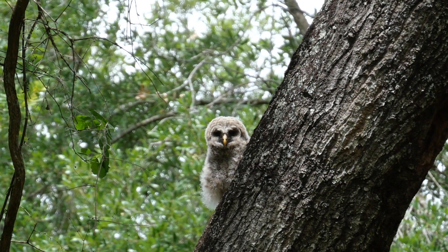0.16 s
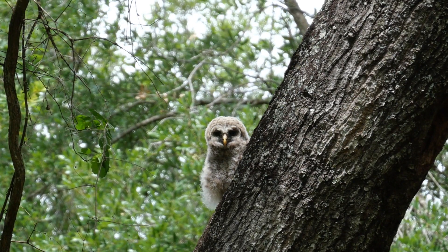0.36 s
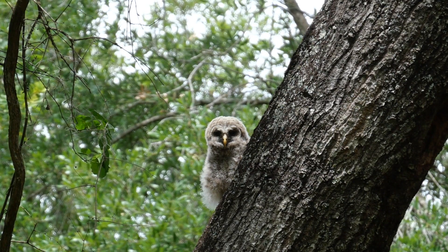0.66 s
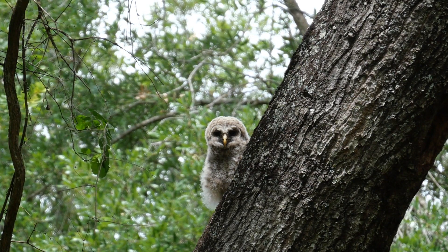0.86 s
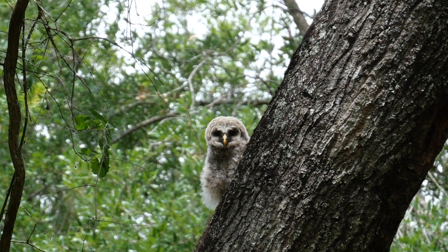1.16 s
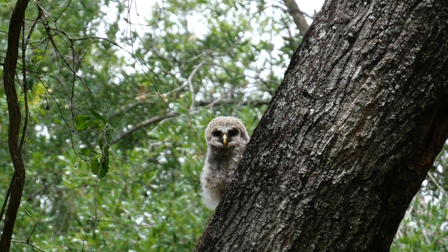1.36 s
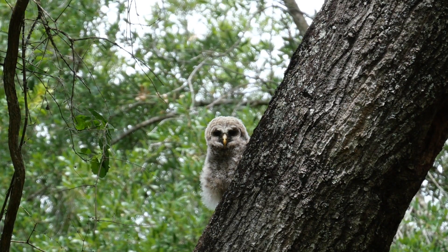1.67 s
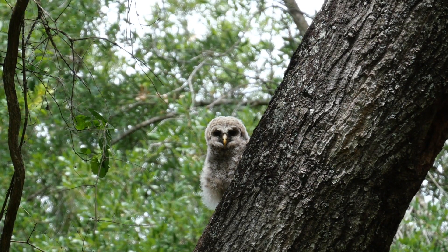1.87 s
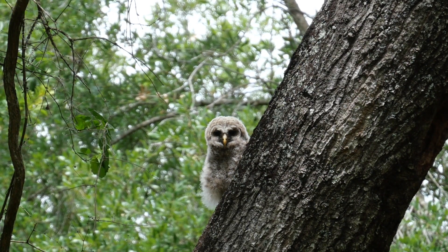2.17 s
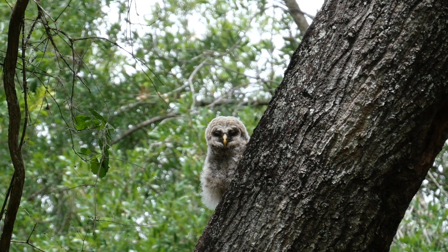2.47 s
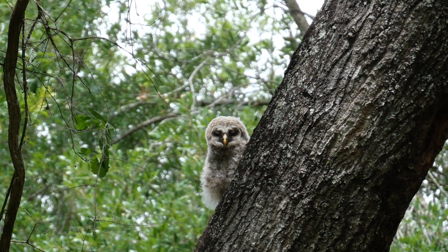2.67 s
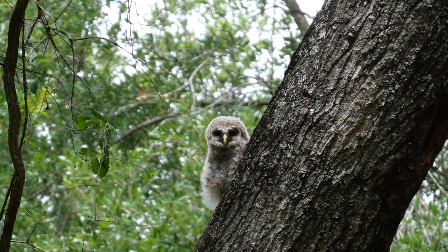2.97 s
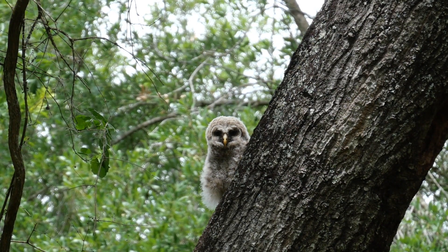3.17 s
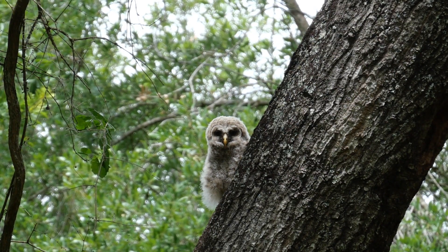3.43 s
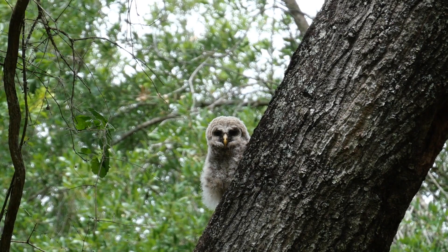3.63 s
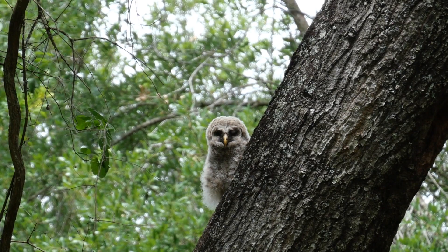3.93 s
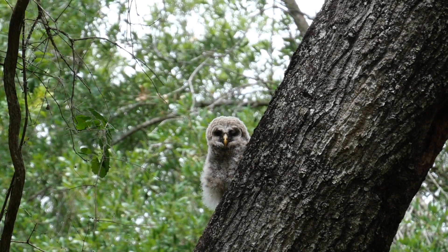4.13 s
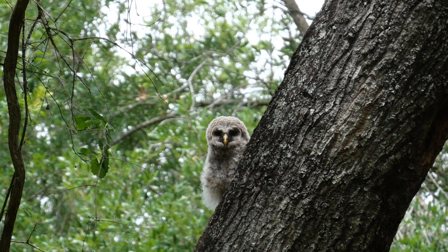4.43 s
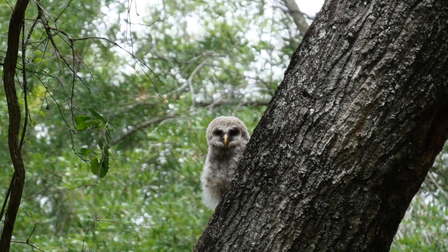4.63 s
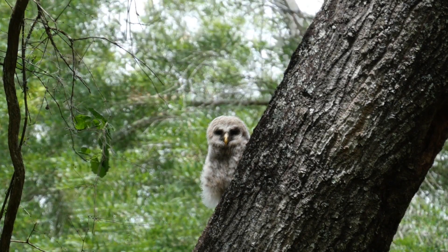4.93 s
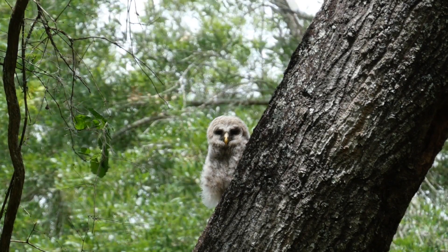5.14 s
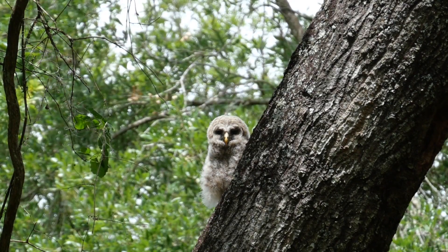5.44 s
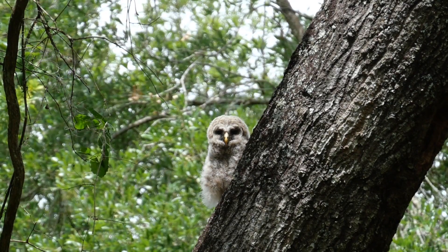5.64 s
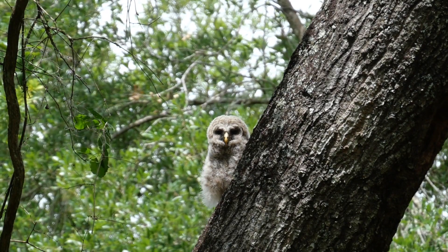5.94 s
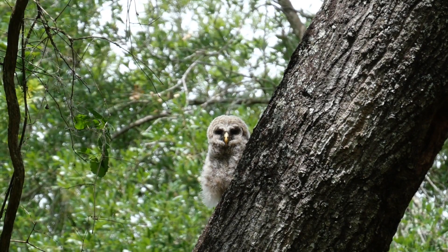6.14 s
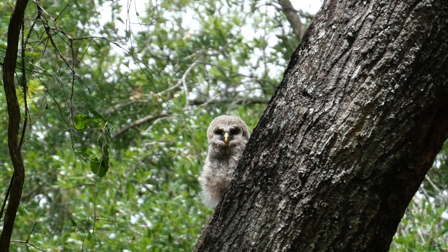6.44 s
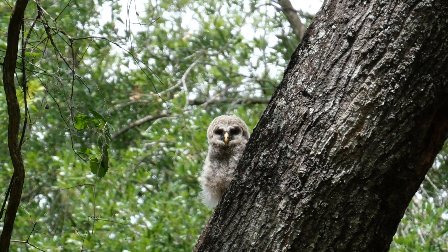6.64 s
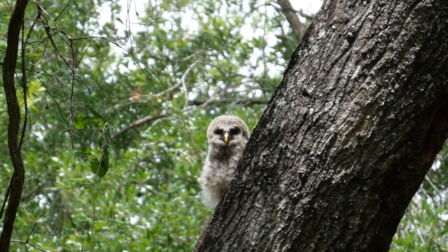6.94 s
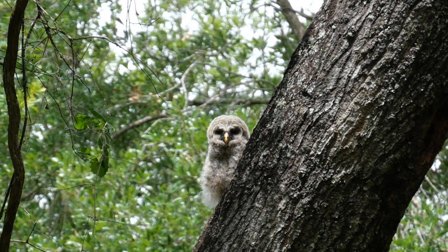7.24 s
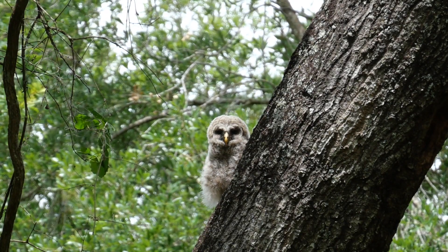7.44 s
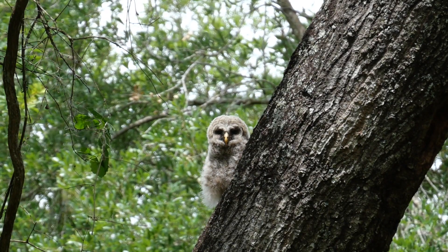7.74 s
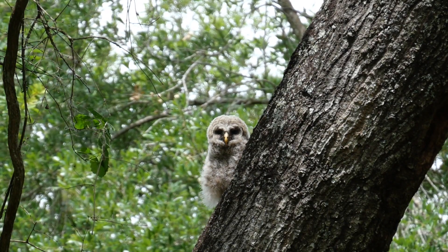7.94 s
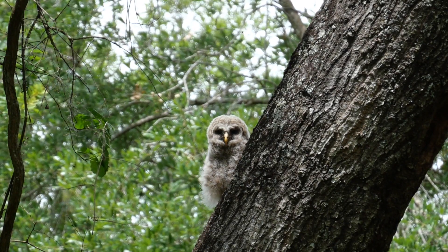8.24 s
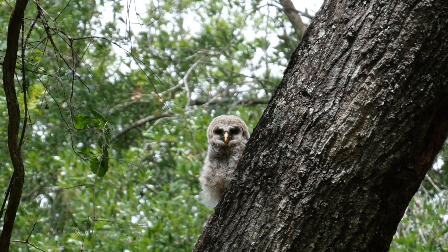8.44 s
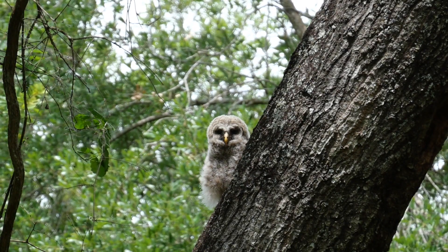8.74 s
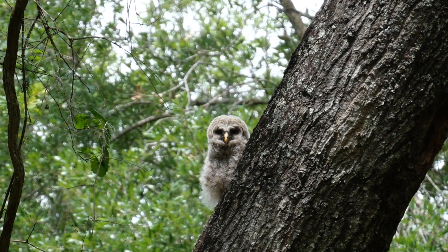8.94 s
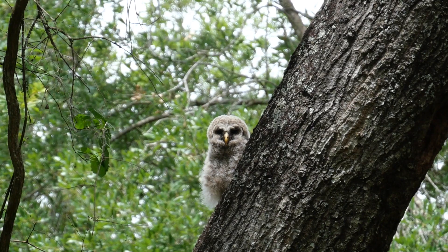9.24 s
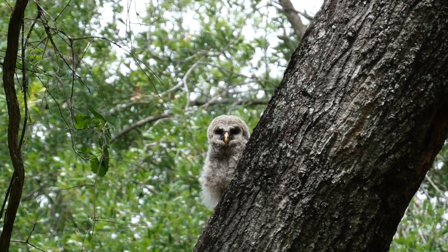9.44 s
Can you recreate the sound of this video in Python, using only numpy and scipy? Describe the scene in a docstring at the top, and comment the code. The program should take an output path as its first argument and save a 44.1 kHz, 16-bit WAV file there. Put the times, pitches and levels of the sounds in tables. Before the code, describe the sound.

Short, echoing owl clucks build into a steady cackle among the trees, with whistling songbirds, thin cricket scraping and a low, faraway rumble.

```python
"""A microphone in the woods, with distant traffic, leaf hiss and a bush cricket scraping throughout.
A large bird gives three lone clucks nearby, its voice membrane slapping shut; the trees return a long,
thin echo. Faint notes and a clucked reply come from farther off, and wind puffs on the microphone.
Halfway a songbird starts rising whistles, a second cricket joins, twigs tick and a far hum comes up.
The large bird cackles on to the end, while another songbird sings two runs of a looping phrase."""
import sys
import numpy as np
from scipy import signal
from scipy.fft import rfft, irfft
from scipy.io import wavfile

SR = 44100
rng = np.random.default_rng(int(sys.argv[2]) if len(sys.argv) > 2 else 0)


def pcm_store(signal):
    """Save signal as 16-bit PCM."""
    levels = np.round(np.clip(np.atleast_2d(signal), -1, 1) * 32767)
    wavfile.write(sys.argv[1], SR, levels.astype(np.int16).T)


N = 423360
TIME = np.arange(N) / SR
LEAD = SR // 2   # samples of run-in, so that earlier echoes still ring
SIDE = np.array([[1], [-1]])   # adds on the left, subtracts on the right

# clucks, near and far: (time [s], length [s], level [dB], pitch [Hz], roughness [0 = clean],
# gain of the direct path through the leaves [dB])
CLUCKS = [(-.085, 0.1, -36.5, 1037, 0.55, 0.5), (0.389, .085, -35.5, 1020, .5, -0.5),
          (1.204, .078, -36.5, 1005, .8, -.5), (1.737, 0.078, -38, 971, 1.03, -1),
          (3.594, 0.089, -49.5, 1032, 0.8, -14), (3.947, .075, -47, 1042, 1.1, -11),
          (4.137, 0.11, -58, 1048, .6, -12), (4.396, 0.081, -47, 1037, 0.27, -5),
          (4.578, .09, -46.5, 1021, 0.8, -7.5), (4.951, 0.08, -38, 1015, 0.5, -3),
          (5.283, 0.078, -33.5, 1008, 0, -3.5), (5.544, .064, -34, 1032, 0.56, -2),
          (5.836, 0.073, -32.5, 1044, 0.39, -3), (6.142, 0.067, -32.5, 1051, 0.48, -2),
          (6.476, 0.081, -32.5, 1062, 0.25, -2), (6.812, 0.085, -32, 1050, 0.36, -1.5),
          (7.119, 0.0254, -32.5, 1025, 1, -1.5), (7.137, 0.047, -36.5, 1046, 0.81, -0.5),
          (7.485, 0.092, -32.5, 1062, 0.34, -1.5), (7.867, 0.083, -30.5, 1057, 0.16, -2),
          (8.26, 0.087, -31.5, 1050, 0.1, -1.5), (8.669, 0.09, -31, 1060, 0.18, -1.5),
          (9.081, 0.093, -31.5, 1052, 0.05, -1.5), (9.507, 0.1, -32.5, 1063, 0.21, -0.5)]
# course of one cluck: (position [share of length], pitch [ratio], clear tone [dB], its overtones [dB],
# slap spacing [swings], slap [dB])
CLUCK_SHAPE = [(0, .90, -12.5, 2, 6, -11.5), (.12, .925, -8.5, -1.5, 6, -10), (.28, .97, -4.5, -2, 5, -3),
               (.39, 1, -6, -25, 3, 0), (.6, 1, -9.5, -23, 3, -1.5), (.71, 1.16, -7.5, 4.5, 4, -7.5),
               (.8, 1.15, -9.5, -1, 4, -16), (.91, 1.08, -12, 7, 4.1, -19), (1, 0.83, -40, 5, 6, -42)]
# harmonics of the clear tone: (harmonic [number], level [dB])
CLUCK_HARMONICS = [(1, 0.5), (2, -3.5), (3, -9), (4, -13.5)]
# resonances of throat and open bill: (frequency [Hz], width [Hz], gain [dB])
THROAT = [(1200, 440, -47), (1375, 214, -3), (2000, 1000, -1.5), (2464, 238, 4.5), (2680, 124, -7),
          (3430, 1050, 0.5)]
# narrow bands that the cackle's echo favours: (frequency [Hz], width [Hz], gain [dB])
ECHO_RINGS = [(1020, 20, 1.5), (2330, 20, -0.5), (2546, 12, -4), (3420, 78, -8)]
# echo of the trees: (frequency [Hz], time to fall 60 dB [s], level [dB])
TREE_ECHO = [(1020, 1.07, -1.5), (1540, 1.3, 0), (2200, 1.33, 0), (2200, 1.33, 1), (2580, 0.83, 2),
             (3270, 1.4, 3), (5330, 1, 2.5), (8800, 0.13, -40)]
# stereo width of the background: (frequency [Hz], side against mid [dB])
STEREO_WIDTH = [(30, -28), (120, -33.5), (350, -18.5), (900, -15.5), (2500, -11.5), (5000, -4.5),
                (7500, -12.5), (8600, -34), (10000, -34), (14000, -28)]
# spectrum of the distant traffic: (frequency [Hz], relative density [dB])
RUMBLE_SPECTRUM = [(12, -41), (20, -8), (54, -2.5), (107, 0.5), (202, -5.5), (329, -12), (367, -14.5),
                   (498, -17), (665, -20.5), (905, -23), (1050, -21), (1120, -26.5), (1500, -42),
                   (1950, -59), (3300, -120)]
# course of the traffic rumble: (time [s], level before trim [dB])
TRAFFIC_LEVEL = [(0.1, -55), (4.5, -53.5), (5.02, -57.5), (5.28, -54), (9.42, -53.5), (9.45, -51)]
# spectrum of the leaf hiss: (frequency [Hz], relative density [dB])
LEAF_SPECTRUM = [(1200, 2.5), (2000, 2), (2600, 1.5), (3500, -4.5), (5000, -2.5), (6500, -6), (7600, 5.5),
                 (8400, 0.5), (9400, 8.5), (10600, -22), (11100, -9), (15500, -10)]
# one wing stroke of each cricket: (position [share of stroke], pitch [Hz], relative level [dB])
FIRST_STROKE = [(0, 9635, -12), (.15, 9460, 3), (.35, 10400, 9), (.52, 10630, 7.5), (.7, 10140, 8),
                (.87, 9266, 11), (1, 9520, -8)]
SECOND_STROKE = [(0, 9600, -15), (.2, 9690, 0), (.45, 10090, 14), (.65, 10020, 8), (.85, 9260, -18),
                 (1, 9530, -27)]
# notes of far birds: (time [s], length [s], first pitch [Hz], last pitch [Hz], level [dB])
FAR_NOTES = [(1.523, 0.077, 2870, 2100, -62), (1.64, 0.093, 2040, 2270, -61),
             (2.704, 0.21, 2390, 2310, -69), (3.001, 0.26, 2710, 2630, -74), (3.843, .06, 3250, 3210, -70),
             (4.201, 0.041, 3150, 4060, -60.5), (4.645, 0.2, 4700, 2600, -66.5),
             (7.708, 0.2, 4650, 4200, -62), (8.531, 0.09, 4680, 4400, -64)]
# rising whistles: (time [s], length [s], pitch [Hz], level [dB], sweep [1 = usual])
WHISTLES = [(4.272, 0.076, 2510, -52.5, 2.17), (4.397, 0.076, 2512, -46, 1.1),
            (5.367, .17, 2820, -48, 1.07), (5.649, .098, 2825, -46.5, .8), (5.886, 0.096, 2735, -47.5, .7),
            (6.163, 0.12, 2730, -48.5, .6), (6.398, .14, 2680, -45, .6), (6.636, 0.13, 2670, -47, .9),
            (6.904, .15, 2617, -49.5, 1), (7.19, 0.16, 2630, -49, 1.1), (7.494, .066, 2514, -37.5, 1.2),
            (7.554, .1, 2630, -41.5, .5), (7.903, 0.093, 2674, -46, 0.84)]
# course of one whistle: (position [share of length], pitch [ratio], relative level [dB])
WHISTLE_SHAPE = [(0, .89, -18), (.2, .95, -5), (.6, 1, 0), (.86, 1.04, 1), (.93, 1.05, -2), (1, 1.05, -10)]
# course of one sharp chip: (time [s], pitch [Hz], level [dB])
CHIP = [(4.578, 5160, -50), (4.584, 6510, -57), (4.590, 5570, -40.5), (4.596, 5660, -47),
        (4.604, 5870, -57)]
# twig ticks: (time [s], level before filtering [dB])
TWIG_TICKS = [(4.896, -38), (5.450, -41)]
# runs of the looping phrase: (time [s], last phrase starts before [s], period [s], level [dB])
SONG_RUNS = [(5.088, 6.4, .2895, -48.5), (8.592, 9.6, .2852, -47.5)]
# the phrase's four slurs, each a list of (time in phrase [s], pitch [Hz], relative level [dB])
PHRASE_SLURS = [
    [(0, 6270, -11), (.008, 5530, -2), (.018, 4690, -2), (.028, 4490, -2)],
    [(.040, 3010, -1.5), (.051, 3416, 5), (.060, 4590, 1), (.066, 4830, 6), (.073, 4750, -12)],
    [(.108, 3945, -18), (.121, 3650, 7), (.133, 3090, 4), (.142, 3010, -2)],
    [(.160, 2897, -13), (.185, 2550, 0), (.215, 2000, -2), (.230, 1950, -32)],
]


def from_db(db):
    """Decibels to gain."""
    return 10 ** (np.asarray(db) / 20)


def rms_one(x):
    """Scale to rms 1."""
    return x / np.sqrt(np.mean(x ** 2) + 1e-20)


def along(rows, where):
    """Every later column of a table, read along its first."""
    first, *columns = np.transpose(rows)
    return [np.interp(where, first, column) for column in columns]


def at_hz(points, hz):
    """A spectrum read on a log-frequency axis."""
    point_hz, value = np.transpose(points)
    return np.interp(np.log(hz + 1), np.log(point_hz), value)


def band(x, edge_hz, kind, order=2):
    """Butterworth filter."""
    sections = signal.butter(order, np.clip(edge_hz, 5, SR / 2 - 500), kind, fs=SR, output="sos")
    return signal.sosfilt(sections, x + 1e-18)


def drift(rate_hz, size):
    """A random wander with a spread of about 1."""
    wander = band(rng.standard_normal(size + LEAD), rate_hz, "low")
    return rms_one(wander[LEAD // 2:])[-size:]


def add(track, time_s, sound):
    """Mix a sound into a track that begins with the run-in."""
    start = max(round(time_s * SR) + LEAD, 0)
    part = sound[:max(len(track) - start, 0)]
    track[start:start + len(part)] += part


def turns(hz):
    """Cycles completed at a moving pitch."""
    return np.cumsum(hz) / SR


def swell(start_s, attack_s, hold_s, release_s, db):
    """A gain that rises, holds and dies away."""
    rise = np.clip((TIME - start_s) / attack_s, 0, 1)
    return from_db(db) * rise * np.exp(-np.maximum(TIME - start_s - attack_s - hold_s, 0) / release_s)


def ring(clicks, hz, width_hz):
    """A resonance: each click sets a dying sine ringing."""
    radius, angle = np.exp(-np.pi * width_hz / SR), 2 * np.pi * hz / SR
    return signal.lfilter([0, np.sin(angle)], [1, -2 * radius * np.cos(angle), radius ** 2], clicks + 1e-18)


def cluck(length_s, pitch_hz, bright_db, rough, glide_depth, rasp_db=-34, flutter_db=5.5):
    """The voice membrane swings near 1 kHz and, driven hard, slaps shut every few swings."""
    size = int(length_s * SR)
    glide, tone_db, overtone_db, spacing, slap_db = along(CLUCK_SHAPE, np.arange(size) / size)
    waver = 1 + .008 * (1 + rough) * drift(200, size)
    cycles = turns(pitch_hz * glide ** glide_depth * waver)
    slaps, swing, wait = np.zeros(size), 1, 1
    for late, weakness, slip in rng.standard_normal((40, 3)):
        i = np.searchsorted(cycles, swing + 0.11 * rough * slip)
        if i >= size:
            break
        pressure = (wait / spacing[i]) ** 0.051   # builds during the wait
        slaps[i] = from_db(slap_db[i] - 0.65 * weakness) * pressure
        wait = max(2, round(spacing[i] + 1.5 * rough * abs(late)))   # a rough voice skips swings
        swing += wait
    slaps += from_db(slap_db + rasp_db) * rng.standard_normal(size)
    bill = sum(from_db(db + bright_db * (k > 1)) * ring(slaps, hz, width)
               for k, (hz, width, db) in enumerate(THROAT))
    tone = sum(from_db(db + (bright_db + overtone_db) * (n > 1)) * np.sin(2 * np.pi * n * cycles)
               for n, db in CLUCK_HARMONICS)
    return bill + from_db(tone_db + flutter_db * rough * drift(130, size)) * tone


def cackle(calm_hz=1007.7, excited_hz=1052):
    """All clucks, as two tracks: through the leaves to the microphone, and out into the woods."""
    tracks = np.zeros((2, N + LEAD))
    for time_s, length_s, db, pitch_hz, rough, direct_db in CLUCKS:
        glide_depth = np.interp(pitch_hz, [calm_hz, excited_hz], [.35, 1])   # excitement widens the glide
        bright_db = 0.3 + 0.6 * rough + 0.27 * direct_db   # roughness adds treble, leaves take it
        call = from_db(db) * cluck(length_s, pitch_hz, bright_db, rough, glide_depth)
        add(tracks[0], time_s, from_db(direct_db) * call)
        add(tracks[1], time_s, call)
    voice = band(tracks, 920, "high", order=10)
    top_rasp = from_db(-13) * band(voice, 4700, "high", order=6)
    return band(voice, 3600, "low", order=6) + top_rasp


def echo_ringing(x):
    """The echo favours a few narrow bands."""
    return x + sum(from_db(db) * band(x, [hz - width / 2, hz + width / 2], "band", order=1)
                   for hz, width, db in ECHO_RINGS)


def tree_echo(x, build_s=0.0074, lumpy_db=4):
    """Echoes off many trunks, some stronger than others, dying soonest in the high treble."""
    t = TIME[:SR * 3 // 2]
    echoes = rms_one(rng.standard_normal(len(t)) * from_db(lumpy_db * drift(132, len(t))))
    spectrum = rfft(echoes * (1 - np.exp(-t / build_s)))
    hz = np.arange(len(spectrum)) * SR / len(t)
    centres_hz, response = np.array(TREE_ECHO)[:, 0], 0
    for this_band, (_, t60, db) in zip(np.eye(len(TREE_ECHO)), TREE_ECHO):
        weight = at_hz(np.column_stack([centres_hz, this_band]), hz)
        response += irfft(spectrum * weight, len(t)) * from_db(db - 60 * t / t60)
    return signal.fftconvolve(x, response / np.sqrt(np.sum(response ** 2)))[:len(x)]


def stereo_noise(spectrum):
    """Coloured noise, nearly the same in both channels; rms 1."""
    hz = np.arange(N // 2 + 1) * SR / N
    mid, side = rfft(rng.standard_normal((2, N))) * from_db(at_hz(spectrum, hz))
    return rms_one(irfft(mid + side * from_db(at_hz(STEREO_WIDTH, hz)) * SIDE, N))


def far_drone(hz, width_hz):
    """A note that fades in and out on its long way to the microphone."""
    phase = 2 * np.pi * turns(hz * np.ones(N))
    return drift(width_hz, N) * np.sin(phase) + drift(width_hz, N) * np.cos(phase)


def distant_traffic(trim_db=-0.42, cruise_hz=106.2, octave_up_at_s=9.58, db_per_octave=7.5):
    """A far road rumbles; one engine cruises, then speeds up ever faster and grows louder."""
    rumble = from_db(along(TRAFFIC_LEVEL, TIME)[0] + trim_db) * stereo_noise(RUMBLE_SPECTRUM)
    speed = 1 + np.exp((TIME - octave_up_at_s) / .95)
    engine_db = -65.5 + db_per_octave * np.log2(speed)
    return rumble + from_db(engine_db) * far_drone(cruise_hz * speed, width_hz=5.9)


def leaf_hiss(db=-60.5):
    """A steady, faint hiss from the foliage round the microphone."""
    return from_db(db) * stereo_noise(LEAF_SPECTRUM)


def cricket(stroke, strokes_per_s, top_hz=10750):
    """A scraper runs over a file of teeth: pitch follows the wing's speed; leaves scatter the sound."""
    position = turns(strokes_per_s * (1 + 0.00398 * drift(2, N))) % 1
    hz, db = along(stroke, position)
    level = from_db(db + 1.6 * drift(200, N))
    song = level * np.sin(2 * np.pi * turns(hz * (1 + 0.0178 * drift(1180, N))))
    t = TIME[:SR // 40]
    leaves = rng.standard_normal(len(t)) * np.exp(-t / 0.0063) * from_db(-22.5)
    leaves[0] = 1   # the direct path
    return rms_one(band(signal.fftconvolve(song, leaves)[:N], top_hz, "low", order=16))


def crickets(first_db=-59.5, second_db=-60.5, join_s=(4.8, 5.43)):
    """One insect sings throughout; a second swells from a murmur to full song halfway."""
    first = from_db(first_db) * cricket(FIRST_STROKE, strokes_per_s=70.5)
    joining_db = np.interp(TIME, join_s, [-12, 0])
    return first + from_db(second_db + joining_db) * cricket(SECOND_STROKE, strokes_per_s=66.5)


def slur(course, octave_db, waver, flutter_db):
    """A bird's gliding, slightly unsteady whistle with its octave."""
    t = np.arange(course[0][0], course[-1][0], 1 / SR)
    hz, db = along(course, t)
    phase = 2 * np.pi * turns(hz * (1 + waver * drift(115, len(t))))
    level = from_db(db + flutter_db * drift(97, len(t))) * signal.windows.tukey(len(t), .1)
    return level * (np.sin(phase) + from_db(octave_db) * np.sin(2 * phase))


def far_birds():
    """Faint, plain glides from deeper in the woods."""
    track = np.zeros(N + LEAD)
    for time_s, length_s, first_hz, last_hz, db in FAR_NOTES:
        course = [(time_s, first_hz, db), (time_s + length_s, last_hz, db)]
        add(track, time_s, slur(course, octave_db=-35, waver=0.0234, flutter_db=3))
    return track


def wind_puff():
    """One soft, low puff of wind on the microphone."""
    buffeting = rms_one(band(rng.standard_normal(N), [40, 75], "band"))
    return swell(start_s=4.1, attack_s=0.065, hold_s=.08, release_s=0.093, db=-56) * buffeting


def rising_whistles(flick=0.18):
    """A songbird's whistles climb and flick up at the end; low or wide ones have the strongest octave."""
    track = np.zeros(N + LEAD)
    for time_s, length_s, hz, db, sweep in WHISTLES:
        course = [(share * length_s, hz * (ratio ** sweep + flick * sweep ** 2 * share ** 20), db + swell_db)
                  for share, ratio, swell_db in WHISTLE_SHAPE]
        octave_level_db = -60 - .024 * (hz - 2500) + 4 * (sweep - 1)
        add(track, time_s, slur(course, octave_level_db - db, waver=0.0085, flutter_db=3.5))
    return track


def chip():
    """One sharp, high note from a small bird."""
    track = np.zeros(N + LEAD)
    add(track, CHIP[0][0], slur(CHIP, octave_db=-35, waver=.01, flutter_db=4))
    return track


def twigs(decay_s=0.0014):
    """Tiny dry snaps, each a burst of noise."""
    track, t = np.zeros(N + LEAD), TIME[:SR // 50]
    for time_s, db in TWIG_TICKS:
        snap = rng.standard_normal(len(t)) * np.exp(-t / decay_s)
        add(track, time_s, from_db(db) * band(snap, [700, 7000], "band"))
    return track


def far_hum(hz=218.4):
    """A hum from the road comes up and slowly fades."""
    return swell(start_s=4.9, attack_s=0.35, hold_s=.3, release_s=5, db=-66) * far_drone(hz, width_hz=3)


def looping_song(first_phrase_db=-8.5):
    """A songbird repeats a phrase of four slurs, opening each run softly."""
    track = np.zeros(N + LEAD)
    for start_s, end_s, period_s, db in SONG_RUNS:
        for k, time_s in enumerate(np.arange(start_s, end_s, period_s)):
            gain = from_db(db + first_phrase_db * (k == 0))
            for course in PHRASE_SLURS:
                note = slur(course, octave_db=-24, waver=0.0093, flutter_db=3)
                add(track, time_s + course[0][0], gain * note)
    return track


def scene(cackle_echo_db=-12, song_echo_db=-10, echo_side_db=-20):
    """At the microphone: birds in the centre, their echo slightly wider, over insects and traffic."""
    direct_cackle, sent_cackle = cackle()
    song = far_birds() + rising_whistles() + chip() + looping_song()
    into_woods = from_db(cackle_echo_db) * echo_ringing(sent_cackle) + from_db(song_echo_db) * song
    echo = tree_echo(into_woods) + from_db(echo_side_db) * tree_echo(into_woods) * SIDE
    foreground = direct_cackle + song + twigs() + echo
    background = distant_traffic() + leaf_hiss() + crickets() + wind_puff() + far_hum()
    return foreground[:, LEAD:] + background


def record(dry, cutoff_hz=15750):
    """The top is cut steeply."""
    return signal.sosfilt(signal.ellip(12, .1, 80, cutoff_hz, fs=SR, output="sos"), dry)


dry = scene()
out = record(dry)
pcm_store(out)
```